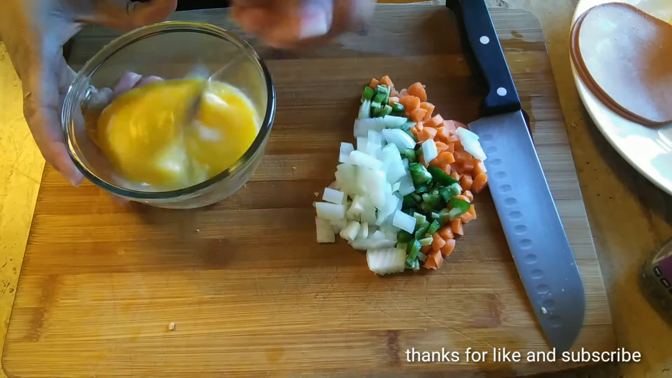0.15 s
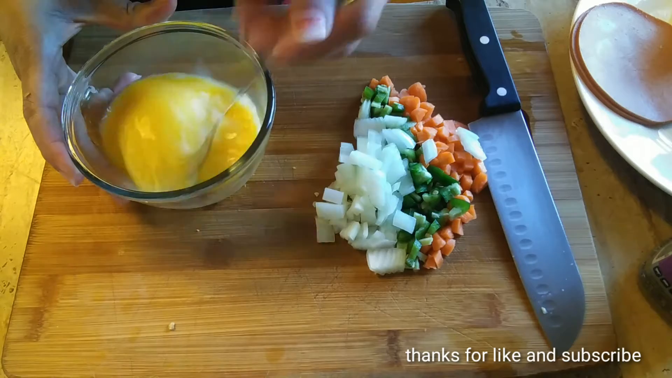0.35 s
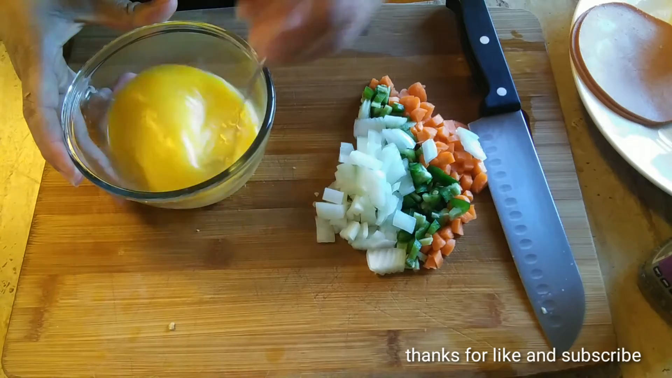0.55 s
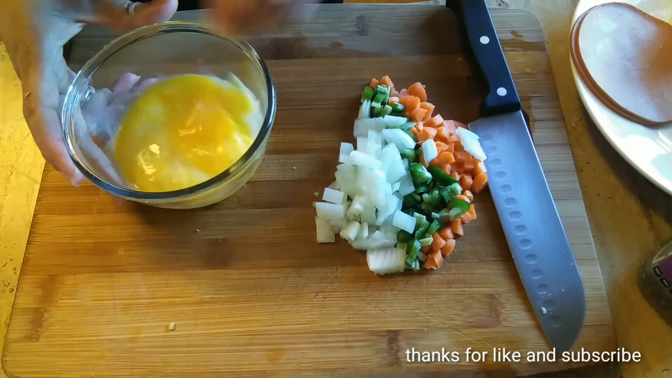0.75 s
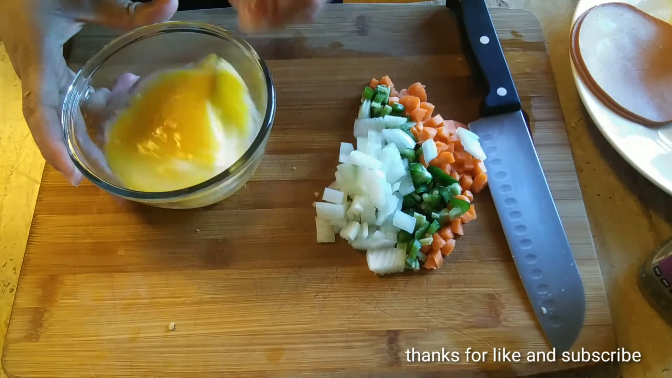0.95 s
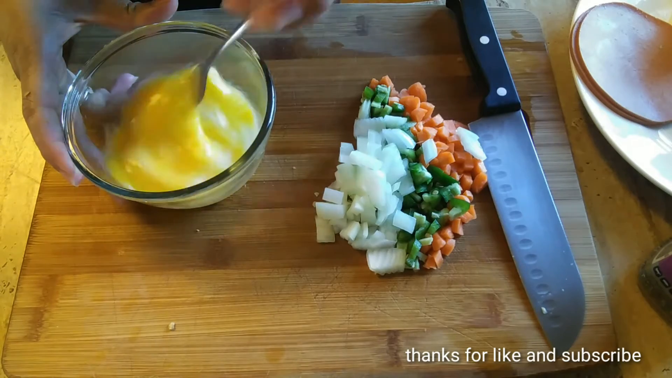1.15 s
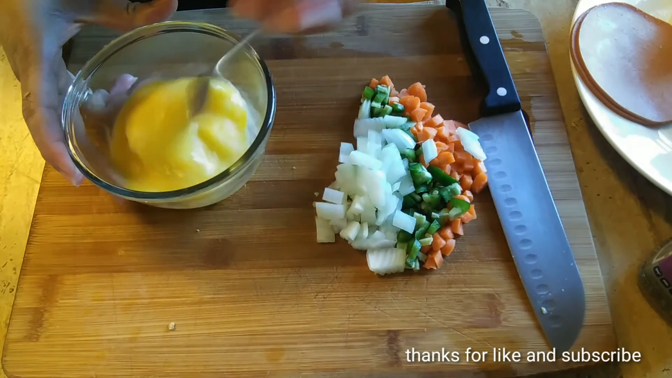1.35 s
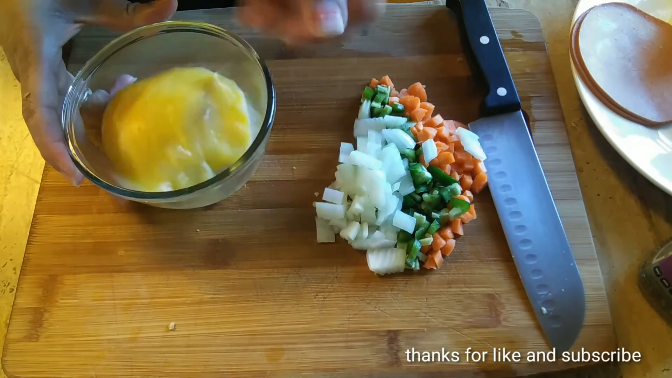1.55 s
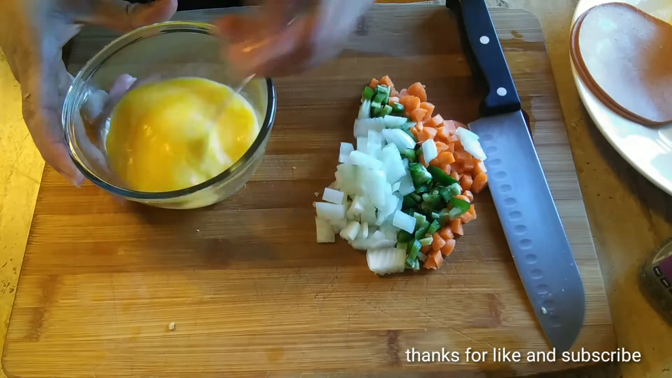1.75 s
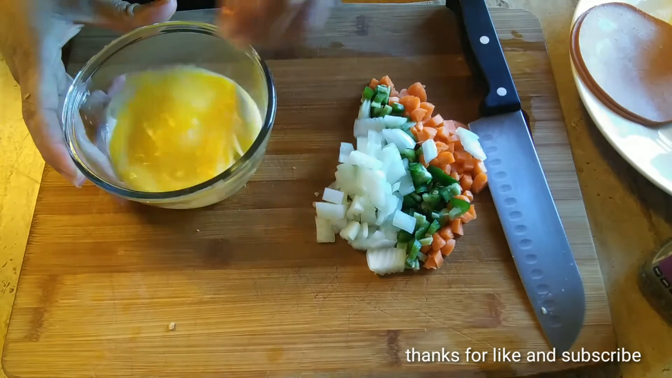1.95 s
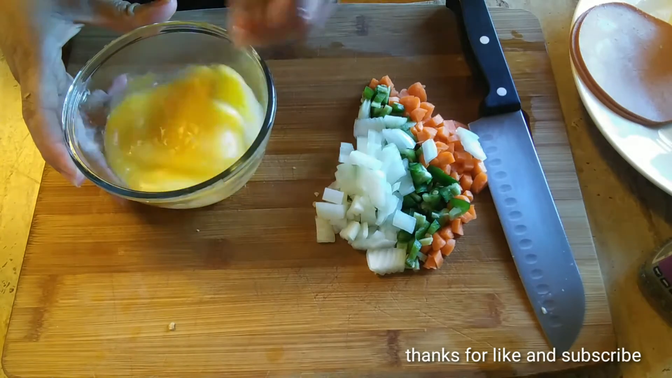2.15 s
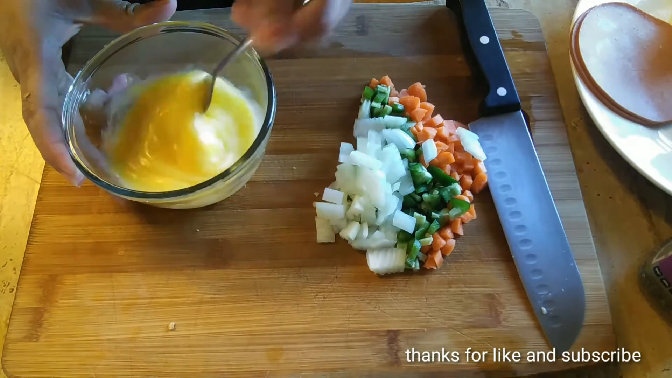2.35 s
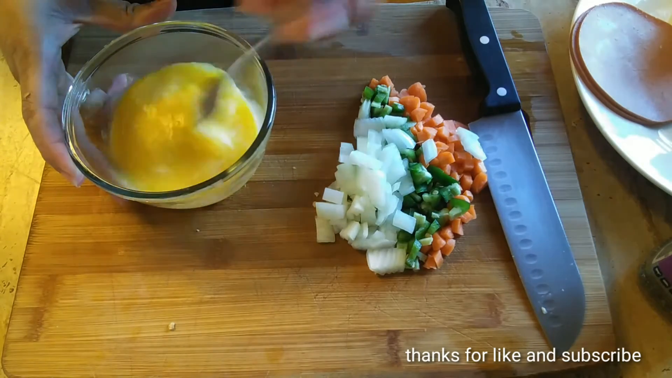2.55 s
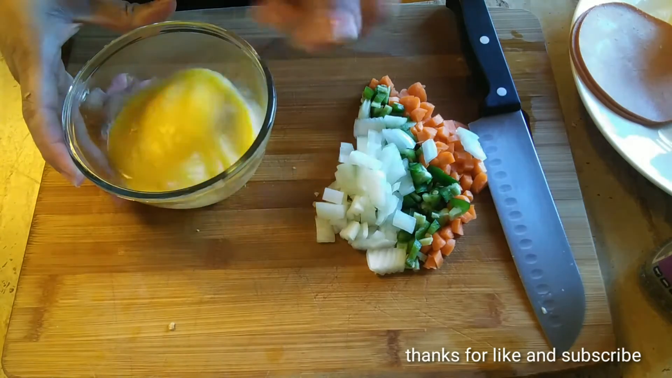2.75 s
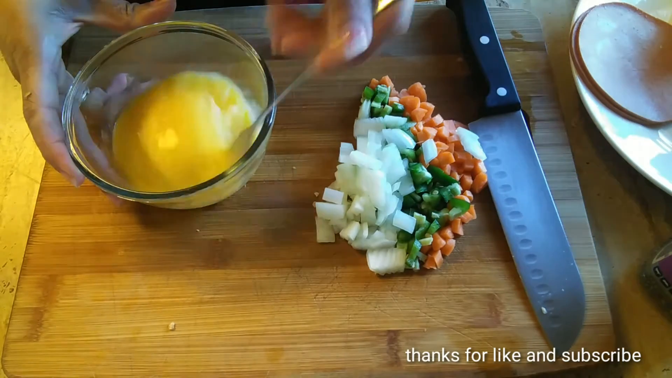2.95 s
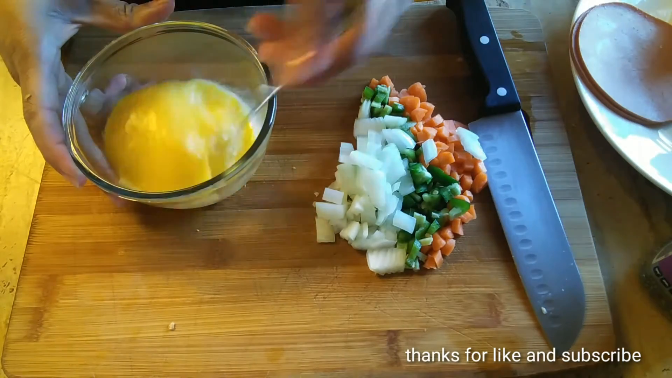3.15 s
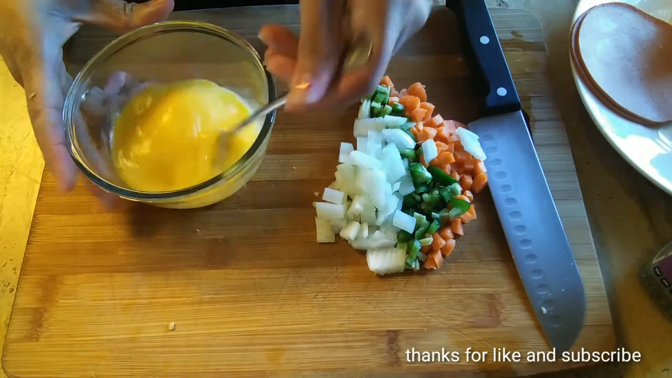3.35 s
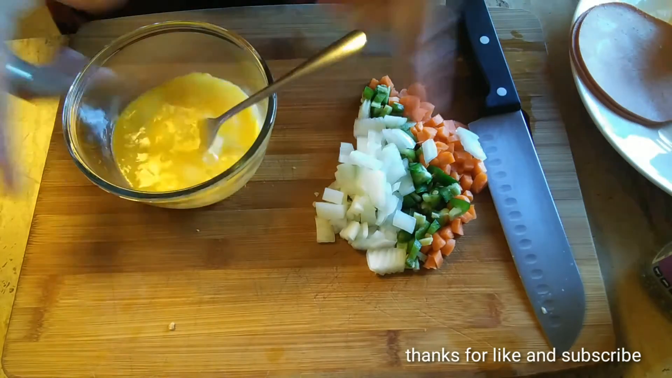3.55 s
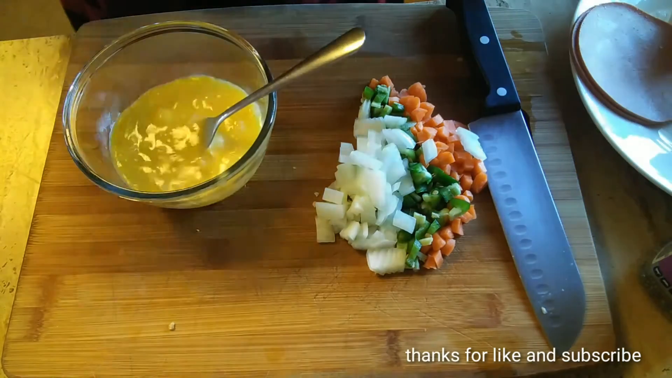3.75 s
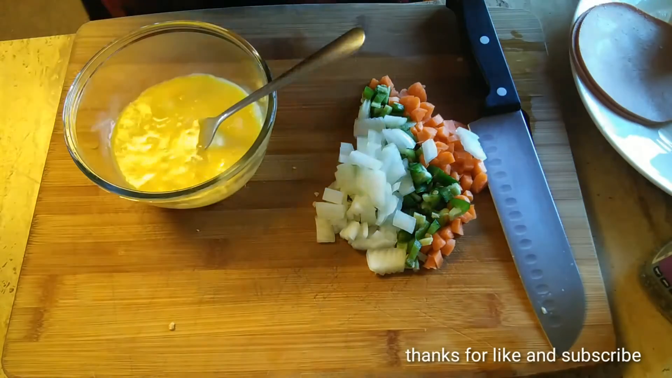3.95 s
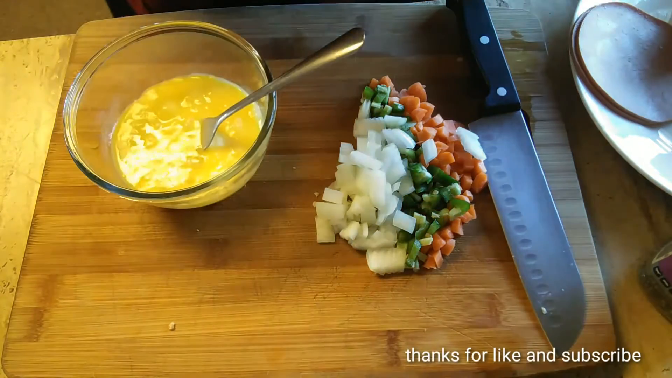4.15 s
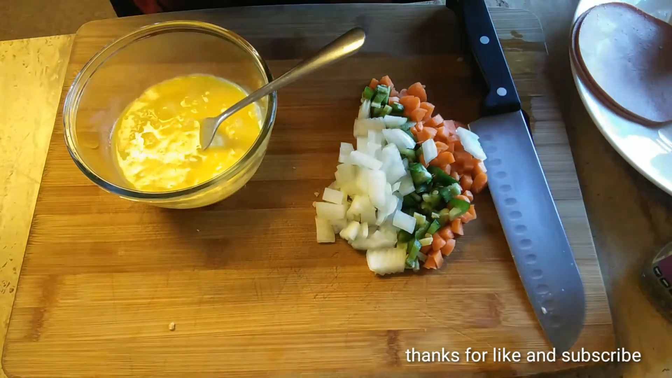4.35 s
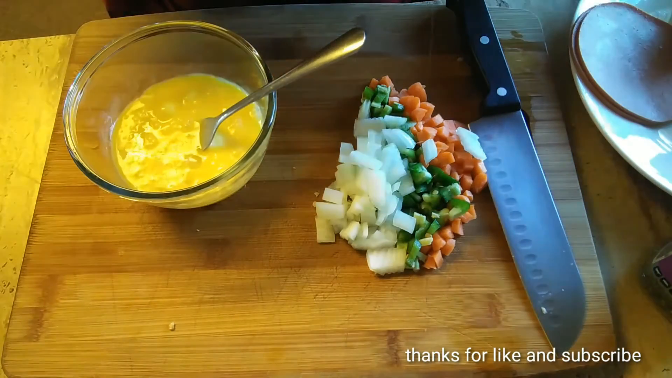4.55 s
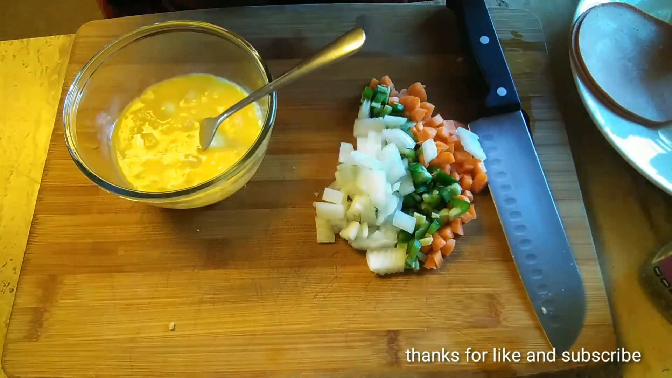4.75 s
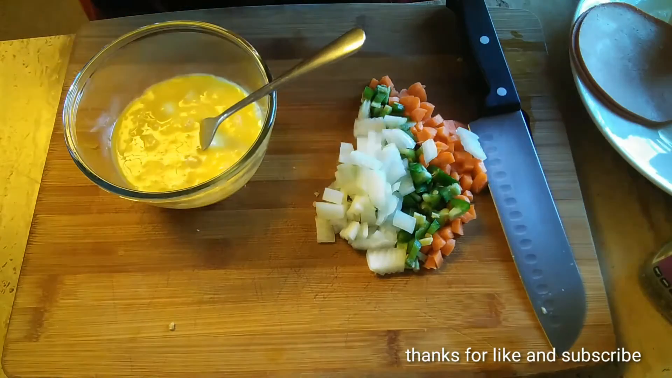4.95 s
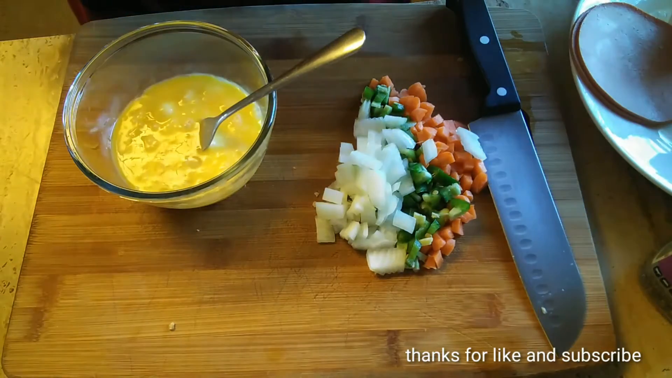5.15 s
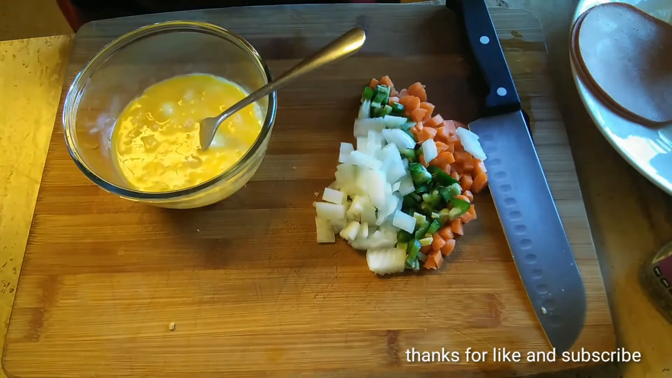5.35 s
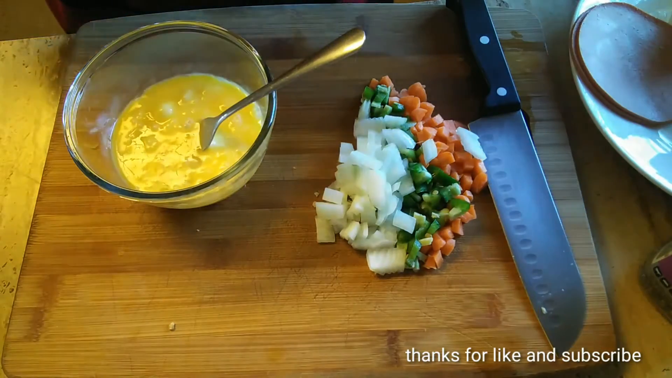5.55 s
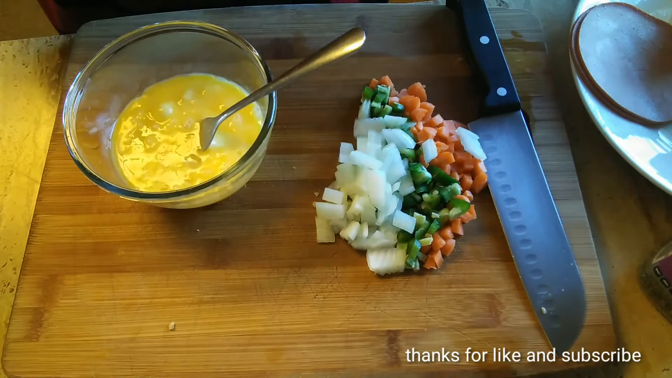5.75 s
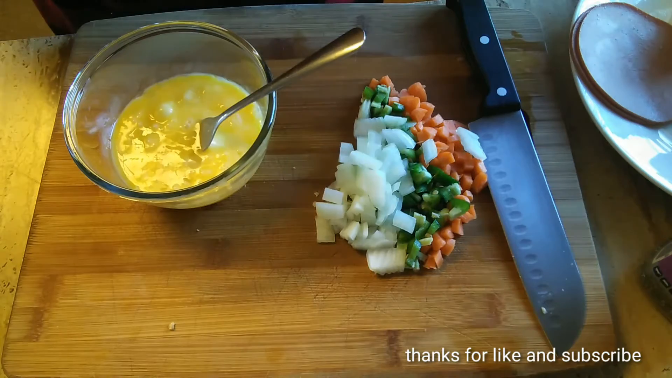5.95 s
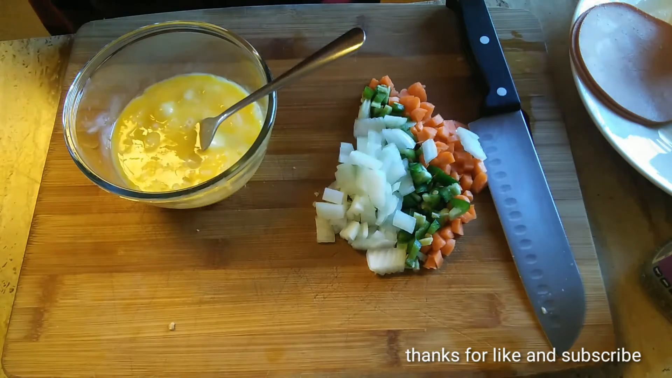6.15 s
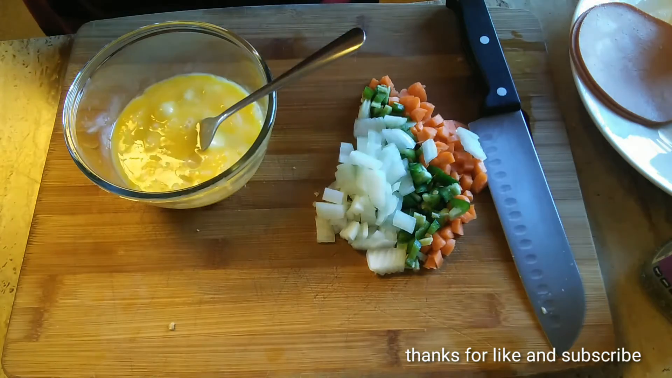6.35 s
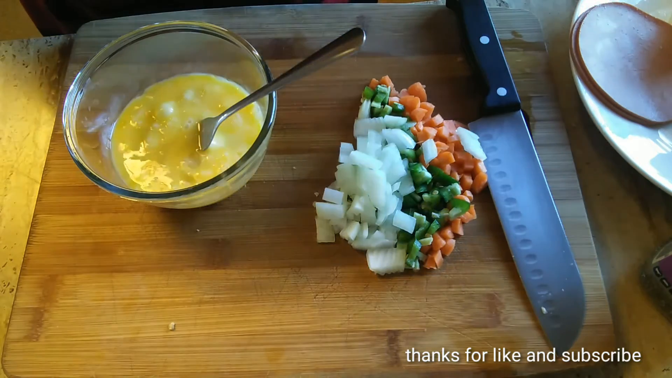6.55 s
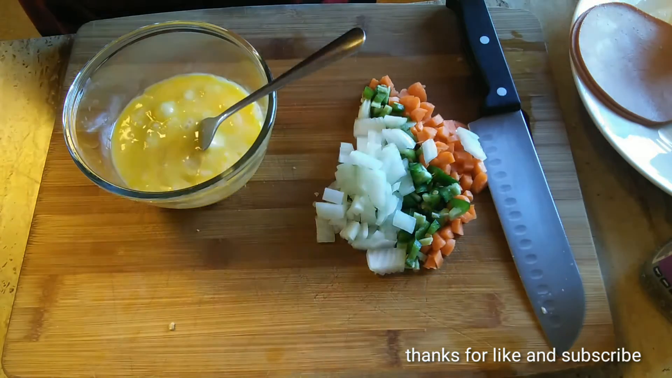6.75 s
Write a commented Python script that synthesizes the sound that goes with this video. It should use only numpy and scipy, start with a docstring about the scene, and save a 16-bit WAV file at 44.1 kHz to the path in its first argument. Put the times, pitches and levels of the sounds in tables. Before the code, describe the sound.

A metal fork rapidly beats eggs in a glass bowl with wet slaps and bright clinks, then drops on the rim; rustles and counter knocks follow.

```python
"""First come the slaps and bright cracks of a metal spoon beating eggs in a glass bowl on a wooden board.
Blows on bare glass add a ring made of dying sines; cracks and slaps are short bursts of shaped noise.
Popping egg is made of short gliding sines, and the pushed board hums at its low modes.
The spoon is dropped on the rim; then cloth and hands rustle (crackling noise) and things knock on the counter.
The microphone is close, in a kitchen with a short echo and a quiet hush of shaped noise."""
import sys
import numpy as np
from scipy import signal
from scipy.fft import rfft, irfft
from scipy.io import wavfile
from scipy.ndimage import uniform_filter1d

SR = 44100
rng = np.random.default_rng(int(sys.argv[2]) if len(sys.argv) > 2 else 0)


def store_wav(level_fs):
    """Save 16-bit WAV to argv[1]."""
    pcm = np.round(np.clip(np.atleast_2d(level_fs), -1, 1) * 32767)
    wavfile.write(sys.argv[1], SR, pcm.T.astype(np.int16))


N = 299429  # length of the scene in samples

# In all names and tables, t60 is the time in seconds to die away by 60 dB.


def amp(db):
    """Turns decibels into a gain."""
    return 10 ** (np.asarray(db) / 20)


def evened(x):
    """Scales a signal to rms 1."""
    return x / np.sqrt(np.mean(x ** 2) + 1e-20)


def read(points, hz):
    """Reads a table between its points, on a log-frequency axis."""
    point_hz, value = np.transpose(points)
    return np.interp(np.log(hz + 1), np.log(point_hz + 1), value)


def add(mix, start_s, sound):
    """Mixes a sound in at start_s, cutting it off at the end of the mix."""
    part = mix[max(round(start_s * SR), 0):][:len(sound)]
    part += sound[:len(part)]


def lowpass(x, hz):
    """Dulls a sound by weakening everything above hz."""
    return signal.sosfilt(signal.butter(2, hz, fs=SR, output="sos"), x)


def wobble(count, size, rough):
    """Slow random turns of level and phase, as a moving load gives them."""
    knots = rng.standard_normal((2, count, size // 280 + 2))
    at = np.arange(size) / 280  # a new random value every 280 samples, straight lines between
    whole, part = at.astype(int), at % 1
    level, phase = knots[..., whole] * (1 - part) + knots[..., whole + 1] * part
    return np.exp(.7 * rough * level), 1.5 * rough * phase


def coloured(points, peak_hz=5000, peak_db=0, width=0.082, size=N, ripple_db=0):
    """Noise of rms 1 with a given spectrum, one peak of relative width and chance narrow resonances."""
    hz = np.fft.rfftfreq(size, 1 / SR)
    peak = peak_db / (1 + ((hz - peak_hz) / (width * peak_hz)) ** 2)
    ripple = ripple_db * evened(uniform_filter1d(rng.standard_normal(len(hz)), size=24))
    white = rfft(rng.standard_normal(size))
    return evened(irfft(white * amp(read(points, hz) + peak + ripple), size))


def burst(points, db, t60, splash_db=-80, **peak):
    """A sudden scatter of noise that dies quickly, with a slower, duller splash behind it."""
    size = 8192
    t = np.arange(size) / SR
    lumps = wobble(count=1, size=size, rough=.35)[0][0]  # the contact stutters
    noise = coloured(points, size=size, ripple_db=3, **peak) * lumps / lumps[:200].mean()
    sharp = amp(-60 * t / t60) * noise
    splash = amp(splash_db - 60 * t / 0.69) * lowpass(noise, 9500)
    rise = np.minimum(t / .0005, 1)  # half a millisecond
    return amp(db) * rise * (sharp + splash)


def bouncing(t60, per_s, rebound_db):
    """A first contact and quick dying rebounds, about per_s of them a second, scaled to energy 1."""
    t = np.arange(3000) / SR
    force = amp(rebound_db - 60 * t / t60) * rng.standard_normal(len(t))
    hits = force * (rng.random(len(t)) < per_s / SR)
    hits[0] = 1
    return hits / np.linalg.norm(hits)


def struck(modes, levels_db, push, late_db, detune=.002, rough=.45, loose_hz=4500):
    """Dying sines of a struck body; the spot struck and the moving load unsettle each mode."""
    hz, db, t60 = np.transpose(modes)[:, :, None]
    t = np.arange(SR // 3) / SR
    share, shift = rng.standard_normal((2, len(modes), 1))
    level, phase = wobble(count=len(modes), size=len(t), rough=rough)
    steady = np.clip(hz / loose_hz, .25, 1)  # modes below loose_hz are unsettled less
    level = (level / level[:, :1]) ** steady
    phase = phase * steady
    turns = 2 * np.pi * hz * (1 + detune * shift) * t + phase - phase[:, :1]
    touched = amp(-60 * t / (.33 * t60))  # damped hard while still touched
    free = amp(late_db - 60 * t / t60)
    sign = (-1) ** np.arange(len(modes))[:, None]  # neighbouring modes start in opposite directions
    start = sign * amp(db + levels_db + 1.5 * share)
    ring = (start * (touched + free) * level * np.sin(turns)).sum(0)
    return signal.fftconvolve(ring, push)


def bubble(db, hz, t60, climb):
    """A dying, unsteady sine whose pitch slides as the cavity changes size."""
    t = np.arange(3000) / SR
    level, phase = wobble(count=1, size=len(t), rough=.45)
    # the pitch moves by 2 * climb of its starting value per second
    turns = 2 * np.pi * hz * t * (1 + climb * t) + phase[0] - phase[0, 0]
    rise = np.minimum(t / 0.000604, 1)
    return amp(db - 60 * t / t60) * rise * level[0] * np.sin(turns)


# colour of the quiet room air: pitch_hz [Hz], level_db [dB per Hz]
HUSH_COLOUR = [(12, -37), (20, -23), (65, -26.5), (165, -2), (404, -5), (535, -11), (709, -9.5),
               (1020, -18), (1320, -17), (1430, -22), (5520, -32.5), (9950, -39.5), (15200, -51),
               (16500, -55.5)]


def hush():
    """Steady, faint noise of the room air."""
    return amp(-54) * coloured(HUSH_COLOUR)


# how fast the room echo dies: pitch_hz [Hz], t60_s [s]
ROOM_DECAY = [(200, 0.089), (600, 0.28), (1500, 0.22), (4000, 0.18), (10000, 0.18), (16000, 0.056)]


def kitchen_echo(x):
    """Echo made of sparse taps of random sign, each band dying at its own speed."""
    taps = np.zeros(SR // 2)
    at = np.arange(160, SR // 2 - 20, 20)
    taps[at + rng.integers(0, 20, len(at))] = rng.choice([-1., 1.], len(at))
    hz, t, bands = signal.stft(taps, SR, nperseg=256)
    dying = bands * amp(-60 * t / read(ROOM_DECAY, hz)[:, None])
    tail = signal.istft(dying, SR, nperseg=256)[1]
    return signal.fftconvolve(x, tail / np.linalg.norm(tail))[:N]


# colour of cloth noise, also used for the clicks of knocks: pitch_hz [Hz], level_db [dB per Hz]
CLOTH_COLOUR = [(240, -32), (400, -11), (490, 12.5), (590, 0), (757, -1), (2180, 0), (3370, -3.5),
                (8060, 1), (14800, -25.5), (16500, -57)]
# cloth and hands rubbing: start_s [s], attack_s [s], hold_s [s], level_db [dB],
# fullness_db [dB, change of the part below 3 kHz]
CLOTH_RUBS = [(4.056, 0.041, 0.099, -59.5, -5.5), (4.189, 0.036, 0.0058, -48, 7),
              (4.605, 0.12, 0.22, -62.5, -14.5), (4.91, 0.029, 0.13, -41, -4.5),
              (5.488, 0.038, .01, -56, 17), (5.801, 0.19, 0.054, -55, 6.5), (6.435, 0.03, 0.22, -57, 4),
              (6.54, 0.081, 0.04, -31, -2.5)]
# single snags of the cloth: start_s [s], level_db [dB]
CLOTH_SNAGS = [(4.816, -30), (4.936, -30.5), (4.946, -35.5), (5.0046, -37), (5.037, -40), (5.278, -52),
               (6.317, -42), (6.464, -38)]
# a rub swells from the depth, sags while held, and lets go
RUB_RELEASE_S, RUB_DEPTH_DB, RUB_SAG_DB = 0.032, -28.5, -11


def rustle():
    """Rubbing noise, crackling with tiny snags of the fibres; the larger snags click."""
    t = np.arange(N) / SR
    fibres = rng.exponential(1, N) * (rng.random(N) < 250 / SR)  # about 250 snags a second
    grain = 3 + signal.lfilter([1], [1, -np.exp(-1 / (.0012 * SR))], fibres)
    rub = evened(coloured(CLOTH_COLOUR, peak_hz=9000, peak_db=8.0, width=0.11) * grain)
    low = lowpass(rub, 3000)
    out = amp(-70) * rub * (t > 4.0)  # a faint steady rustle once the hands have left the bowl
    for start_s, attack_s, hold_s, db, fullness_db in CLOTH_RUBS:
        corners = np.cumsum([start_s, attack_s, hold_s, RUB_RELEASE_S])
        heights_db = [RUB_DEPTH_DB, 0, RUB_SAG_DB, RUB_DEPTH_DB]
        shape_db = np.interp(t, corners, heights_db, left=-120, right=-120)
        out += amp(db + shape_db) * (rub + (amp(fullness_db) - 1) * low)
    for start_s, db in CLOTH_SNAGS:
        add(out, start_s, burst(CLOTH_COLOUR, db, .022, splash_db=-55))
    return out


# things set down: start_s [s], click_db [dB], thud_db [dB], wood_db [dB], hollow_db [dB, added to hollow modes]
COUNTER_KNOCKS = [(4.1381, -52, -55.5, -53, 15), (4.3808, -27.5, -17, -37, 18.5),
                  (4.8239, -27.5, -56, -81, 7), (5.3735, -46.5, -44, -49, 7),
                  (5.433, -51.5, -49, -57, 17.5), (5.502, -56.5, -52, -62.5, 20.5),
                  (5.5919, -32.5, -54, -46, 13.5), (5.9751, -21, -3.5, -14.5, -3.5),
                  (6.3049, -40.5, -53, -51.5, 16.5)]
# ringing modes of the counter: pitch_hz [Hz], level_db [dB], t60_s [s, once free]
COUNTER_MODES = [(146, -5.5, 0.13), (211.7, -4, 0.13), (254.3, 3.5, 0.24), (334, 5, 0.28),
                 (376.6, -10.5, 0.33), (489, 0.5, 0.098), (543, 10.5, 0.098), (610, -10, 0.092),
                 (667, -6.5, 0.32), (720, -2.5, 0.22), (1130, 6.5, 0.085)]
# which counter modes hollow things bring out: mode_number [counted from 0]
HOLLOW_MODES = [4, 8, 9]


def counter():
    """A knock is a click, a thud and the wooden modes, struck again by quick small bounces."""
    out = np.zeros(N)
    hollow = np.isin(np.arange(len(COUNTER_MODES)), HOLLOW_MODES)[:, None]
    for start_s, click_db, thud_db, wood_db, hollow_db in COUNTER_KNOCKS:
        bounces = bouncing(0.024, 600, rebound_db=-9)
        wood = struck(COUNTER_MODES, wood_db + hollow_db * hollow, bounces, late_db=-16.0,
                      detune=0.012, rough=.9, loose_hz=610)
        add(out, start_s, wood)
        add(out, start_s, -bubble(thud_db, hz=259, t60=0.013, climb=0))  # the first push, upside down
        add(out, start_s, burst(CLOTH_COLOUR, click_db, 0.074, splash_db=-32.5))
    return out


# ringing modes of the board: pitch_hz [Hz], level_db [dB], t60_s [s, once free]
BOARD_MODES = [(113.2, -2.5, 0.1), (201.7, -7.5, 0.18), (250.2, -9, 0.36), (379, -3, 0.098)]
# strokes that push the bowl on its board and churn the egg: start_s [s], churn_db [dB, egg only]
SPOON_STROKES = [(0.108, -41), (0.301, -27), (0.459, -18), (0.649, -44), (0.787, -33.5), (0.986, -47),
                 (1.149, -23), (1.334, -53), (1.507, -29), (1.681, -18), (1.859, -25), (2.031, -25.5),
                 (2.21, -36), (2.403, -25), (2.581, -47), (2.747, -53), (2.925, -20), (3.078, -30),
                 (3.276, -32), (3.471, -68), (3.651, -22)]


def board():
    """The slow push of a stroke rings only the low modes of the board."""
    out, push = np.zeros(N), np.hanning(200)
    for start_s, _ in SPOON_STROKES:
        pushes = signal.convolve(bouncing(0.23, 120, rebound_db=-2), push / push.sum())
        add(out, start_s + 0.0032, struck(BOARD_MODES, -36.5, pushes, late_db=2.5))
    return out


# air pockets bursting in the egg: start_s [s], level_db [dB], pitch_hz [Hz, at the start], t60_s [s]
EGG_PLOPS = [(0.038, -26, 1253, 0.059), (0.044, -22, 2880, 0.012), (0.096, -30, 815, 0.03),
             (0.112, -27.5, 720, 0.067), (0.208, -20, 1215, 0.034), (0.29, -22, 688, .05),
             (0.311, -13, 1513, 0.025), (0.48, -3.5, 2000, 0.0075), (0.488, -10, 1146, 0.034),
             (0.506, -27, 731, 0.079), (0.657, -23.5, 1210, 0.051), (0.662, -15, 2410, 0.017),
             (1.323, -36, 1160, 0.049), (1.338, -13, 1810, 0.013), (1.379, -24.5, 1290, 0.058),
             (1.419, -16, 1730, 0.025), (1.504, -31, 971, 0.23), (1.52, -25, 2860, 0.031),
             (1.524, -18, 1316, 0.077), (1.681, -22.5, 956, 0.075), (1.694, -13, 1216, 0.05),
             (1.701, -19, 920, 0.063), (1.712, -15.5, 2260, 0.014), (1.852, -15.5, 1856, 0.032),
             (1.858, -20, 976, 0.096), (1.873, -7.5, 1244, 0.027), (1.888, -8.5, 2200, 0.0053),
             (2.058, -11.5, 555, 0.064), (2.058, -9.5, 1120, 0.027), (2.083, -25.5, 2980, 0.019),
             (2.223, -17.5, 950, 0.021), (2.407, -11, 2560, 0.018), (2.455, -36, 1350, 0.049),
             (2.552, -38, 1520, 0.03), (2.606, -26, 2310, 0.024), (2.682, -36.5, 1390, 0.037),
             (2.745, -26, 726, 0.084), (2.811, -17.5, 1100, 0.017), (3.09, -11.5, 734, 0.01),
             (3.281, 0.5, 1096, 0.0059), (3.473, -22.5, 2160, 0.008)]
# small bubbles that close with a rising pitch: start_s [s], level_db [dB], pitch_hz [Hz, at the start]
EGG_CHIRPS = [(1.648, -35, 1600), (1.794, -37, 1760)]
# a pocket breaks up into small ones: latest delay, level, and pitch range as a fraction either way
SPLIT_S, SPLIT_DB, SPLIT_SPREAD = 0.036, -8.5, 0.11


def egg():
    """Large pockets burst one by one; small bubbles follow each stroke by chance."""
    out = np.zeros(N)
    for start_s, db, hz in EGG_CHIRPS:
        chirp = bubble(db, hz, .07, climb=11)[:800]
        add(out, start_s, chirp * np.hanning(800))  # fades in and out
    for start_s, db, hz, t60 in EGG_PLOPS:
        add(out, start_s, bubble(db, hz, t60, climb=0.44))
        for late, size, pitch, slide in rng.random((4, 4)):
            near_hz = hz * (1 + SPLIT_SPREAD * (2 * pitch - 1))
            small_db = db + SPLIT_DB - 9 * late - 6 * size
            add(out, start_s + SPLIT_S * late, bubble(small_db, near_hz, 0.0091, climb=7 * slide - 2))
    for start_s, churn_db in SPOON_STROKES:
        for late, size, pitch, slide in rng.random((48, 4)):
            small_db = churn_db - 30 * late - 10 * size
            small_hz = 600 * 5.5 ** pitch  # 600 to 3300 Hz
            small = bubble(small_db, small_hz, 0.022, climb=8 * slide - 3)
            add(out, start_s + 0.16 * late ** 2, small)  # crowded just after the stroke
    return out


# colour of a crack on the glass, for ticks, slaps and blows: pitch_hz [Hz], level_db [dB per Hz]
CRACK_COLOUR = [(180, -41.5), (300, -4), (496, -12.5), (938, -13), (1060, -4.5), (1190, -6.5), (1720, -4),
                (2400, 0.5), (3470, -9), (7630, -3.5), (15400, -20.5), (16500, -62)]
# drops of egg ticking on the glass: start_s [s], level_db [dB], peak_hz [Hz]
EGG_TICKS = [(0.053, -21, 7300), (0.435, -36, 7000), (0.644, -32, 4120), (1.288, -29, 8700),
             (1.42, -23.5, 3890), (1.479, -27, 6450), (1.57, -24, 6900), (1.634, -15.5, 5930),
             (2.204, -12, 5000), (2.393, -29, 5000), (3.462, -31, 9050), (3.953, -42, 7870)]


def ticks():
    """A drop of egg makes a tiny, very short crack on the glass."""
    out = np.zeros(N)
    for start_s, db, peak_hz in EGG_TICKS:
        add(out, start_s, burst(CRACK_COLOUR, db, 0.0063, peak_hz=peak_hz, peak_db=16.0, width=0.14))
    return out


# the dropped spoon rattling on the rim: pitch_hz [Hz], level_db [dB], t60_s [s, once free]
SPOON_MODES = [(1140, -26, 0.24), (1300, -31, 0.36), (3467, -36, 0.22)]


def dropped_spoon():
    """The dropped spoon rings its own modes, struck again and again as it rattles on the rim."""
    out = np.zeros(N)
    rattle = bouncing(.25, 300, rebound_db=-4)
    add(out, 3.6483, struck(SPOON_MODES, 0, rattle, late_db=-6, rough=.9, loose_hz=1200))
    return out


# spoon slapping through the egg: start_s [s], crack_db [dB], peak_hz [Hz, resonance of the crack]
SPOON_SLAPS = [(0.0004, -28.5, 7000), (0.1413, -15.5, 8700), (0.2066, -32, 7100), (0.2884, -15.5, 6500),
               (0.3096, -17.5, 8170), (0.4564, -15, 6490), (0.4777, -16, 7670), (0.4879, -20.5, 6670),
               (0.6533, -19, 5050), (0.66, -12.5, 8500), (1.0278, -18.5, 7140), (1.1694, -8, 7900),
               (1.2099, -19.5, 7024), (1.324, -15.5, 7050), (1.3375, -8.5, 8400), (1.4959, -17, 6740),
               (1.5055, -23, 6640), (1.52, -14, 8560), (1.6777, -13.5, 6440), (1.693, -15.5, 5000),
               (1.7014, -17.5, 7300), (1.8526, -15.5, 6140), (1.87, -21, 8950), (1.886, -22.5, 7000),
               (2.026, -12, 6750), (2.057, -9, 7490), (2.067, -14.5, 8580), (2.2351, -12, 8400),
               (2.2627, -16, 7050), (2.407, -9, 8120), (2.455, -27.5, 7540), (2.5792, -10, 7770),
               (2.5934, -25, 4030), (2.7534, -14.5, 4450), (2.8084, -28.5, 8500), (3.081, -16.5, 5106),
               (3.1116, -13.5, 6900), (3.2704, -23.5, 6800), (3.2818, -8.5, 8380), (3.472, -21, 8170)]


def slaps():
    """A slap only cracks, because the egg keeps the glass from ringing."""
    out = np.zeros(N)
    for start_s, db, peak_hz in SPOON_SLAPS:
        add(out, start_s, burst(CRACK_COLOUR, db, 0.035, splash_db=-36.5, peak_hz=peak_hz, peak_db=13.0))
    return out


# spoon on bare glass: start_s [s], crack_db [dB], peak_hz [Hz, resonance of the crack],
# then five ring levels, for the glass modes from low to high: ring1_db to ring5_db [dB]
GLASS_BLOWS = [(0.11, -14.5, 6500, -32.5, -48, -42, -41, -23),
               (0.7932, 0.5, 8060, -27.5, -13.5, -4, -5, -3.5),
               (0.9745, -2.5, 6200, -26.5, -27, -15, -8.5, -2.5),
               (0.992, -9.5, 7350, -27, -32, -50.5, -50, -27),
               (1.1455, -5, 6700, -21, -26.5, -8.5, -7, 0.5),
               (2.2136, -4, 6920, -35.5, -23.5, -18.5, -1, -2.5),
               (2.7365, -18, 6430, -32.5, -21, -53, -41.5, -37),
               (2.7433, -12.5, 7230, -41.5, -20, -17.5, -22.5, -17.5),
               (2.924, -16, 7300, -47, -21.5, -18.5, -37, -21),
               (2.931, -14, 4280, -70, -30, -45, -47, -49.5),
               (3.0898, -10, 4720, -30, -23.5, -22.5, -25, -20),
               (3.6484, -10, 4250, -28.5, -23.5, -15.5, -32, -11),
               (3.692, -23, 4300, -55, -28, -23, -33, -20.5),
               (3.7226, -25.5, 7240, -49, -28.5, -30, -41, -30),
               (3.787, -50, 4000, -53, -53, -40, -52, -46.5)]
# where those five ring levels apply: pitch_hz [Hz]
RING_HZ = [970, 2470, 4520, 5050, 7080]
# modes of the bowl, some in close pairs: pitch_hz [Hz], level_db [dB], t60_s [s, once free]
GLASS_MODES = [(969, 0, .32), (2455, -6, .33), (2515, -6, .3), (3655, -20, .16), (4497, -5, .27),
               (4559, -5, .26), (4610, -10, .2), (4760, -14, .22), (5040, -18, .4), (5450, -16, .16),
               (6200, -12, .14), (6600, -10, .13), (6780, -11, .13), (7056, -1, .22), (7122, -4, .22),
               (7235, -11, .18), (7400, -16, .15), (7800, -19, .12), (8468, -15, .1), (8635, -14, .1),
               (10030, -15, .23), (13420, -27, .17)]
CHATTER_T60 = 0.03  # s, for the crack; the chatter of the ring takes three times as long


def blows():
    """A blow on bare glass is a crack and a chattering ring of the bowl's modes."""
    out, hz = np.zeros(N), np.transpose(GLASS_MODES)[0][:, None]
    free_db = -17.5 * np.clip(hz / 4500, .4, 1)  # the free ring is cut less for the low modes
    for start_s, crack_db, peak_hz, *ring_db in GLASS_BLOWS:
        crack = burst(CRACK_COLOUR, crack_db, CHATTER_T60, splash_db=-33.5, peak_hz=peak_hz, peak_db=12.5)
        add(out, start_s, crack)
        levels_db = read(np.transpose([RING_HZ, ring_db]), hz)
        chatter = bouncing(3 * CHATTER_T60, 1500, rebound_db=-11)
        add(out, start_s, struck(GLASS_MODES, levels_db, chatter, late_db=free_db))
    return out


def scene():
    """Near sources with their room sound, over the hush of the kitchen."""
    glass = blows() + dropped_spoon() + slaps() + ticks() + board()
    wet = egg()
    far = counter() + rustle()
    # the bowl shades the egg from the room
    room = kitchen_echo(amp(-12.5) * glass + amp(-13.0) * wet + amp(-10.0) * far)
    return (glass + wet + far + room + hush())[None]


def record(dry):
    """The microphone squashes the highest peaks and loses the deep bass; then the top treble is cut."""
    squashed = 0.59 * np.tanh(dry / 0.89)
    thin = signal.sosfilt(signal.butter(4, 85, "high", fs=SR, output="sos"), squashed)
    band_limit = signal.firwin(511, 16300, window=("kaiser", 12), fs=SR)
    return signal.oaconvolve(thin, band_limit[None], "same")


dry = scene()
out = record(dry)
store_wav(out)
```